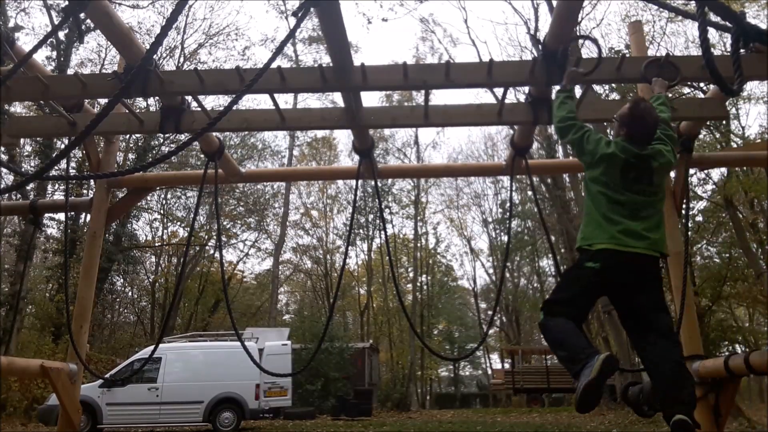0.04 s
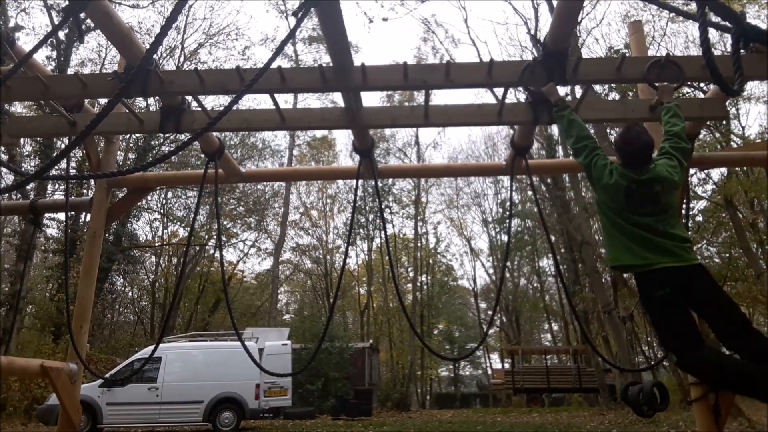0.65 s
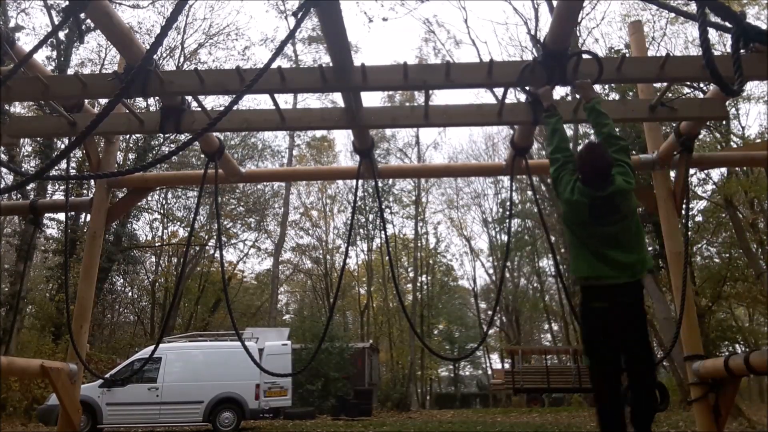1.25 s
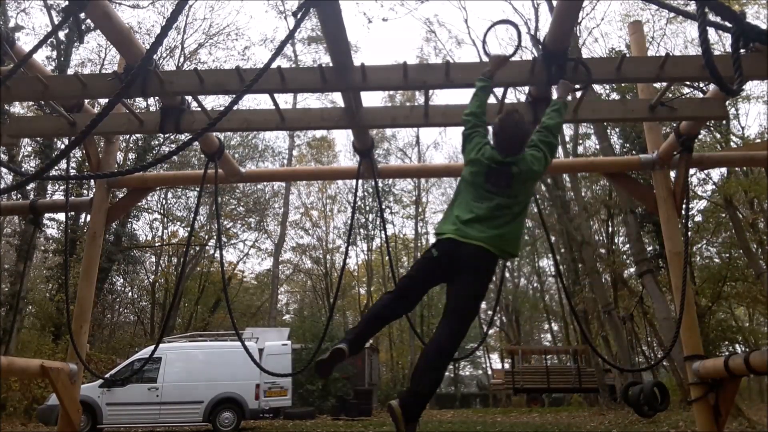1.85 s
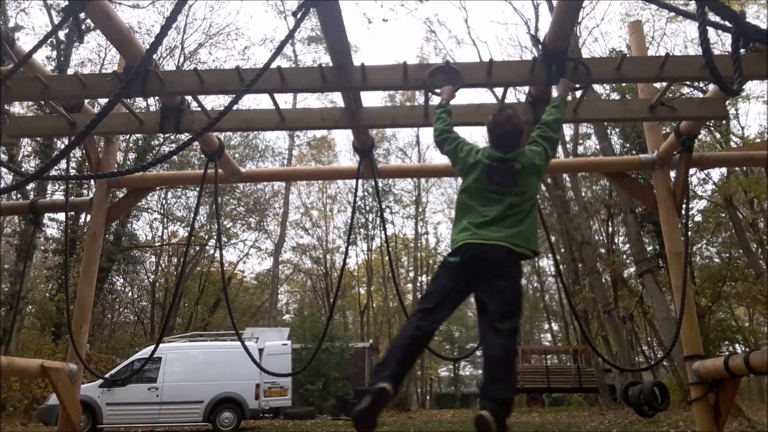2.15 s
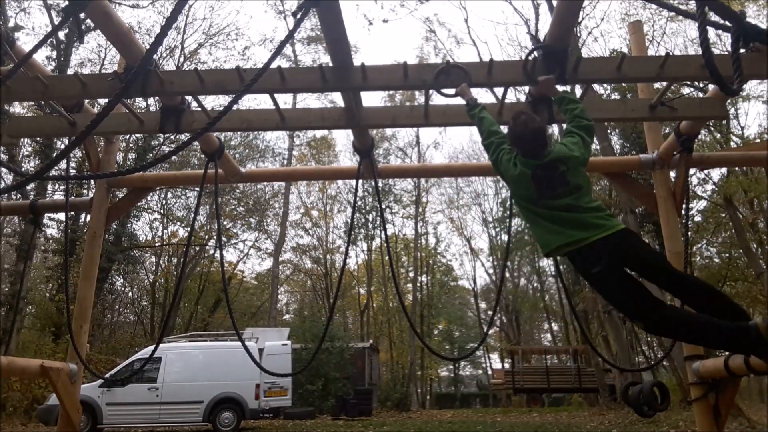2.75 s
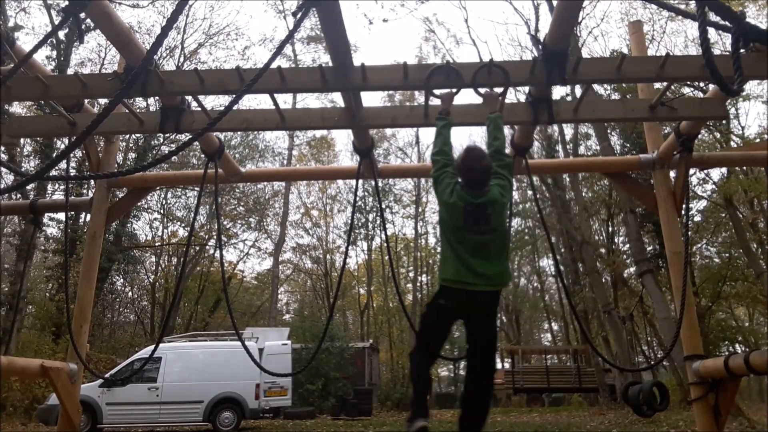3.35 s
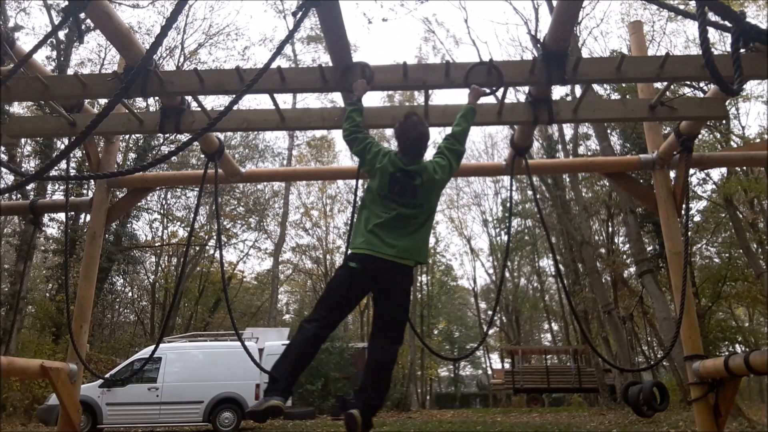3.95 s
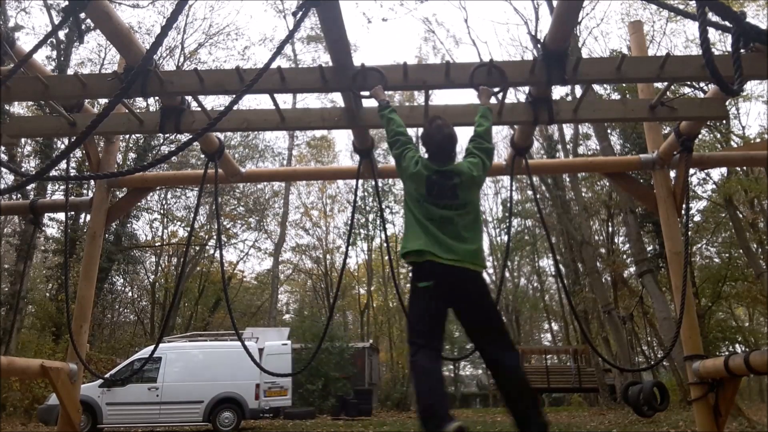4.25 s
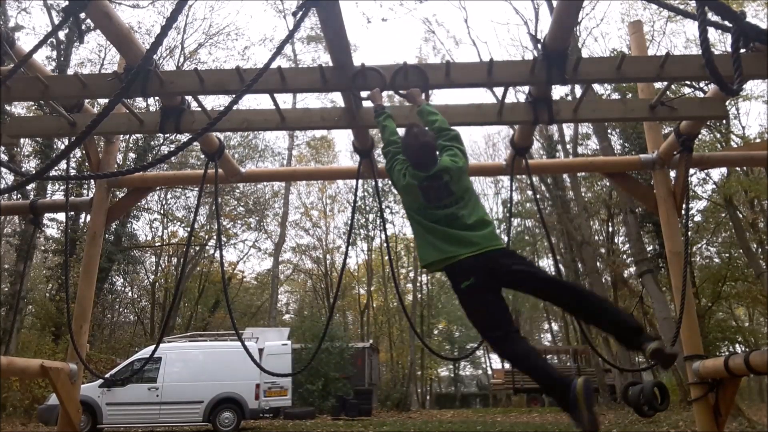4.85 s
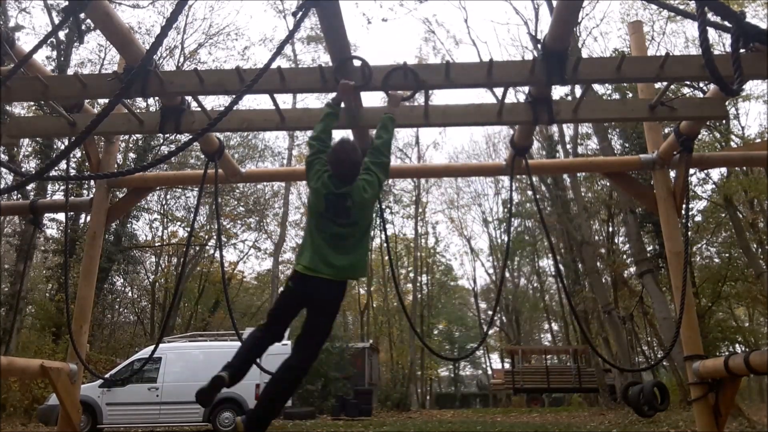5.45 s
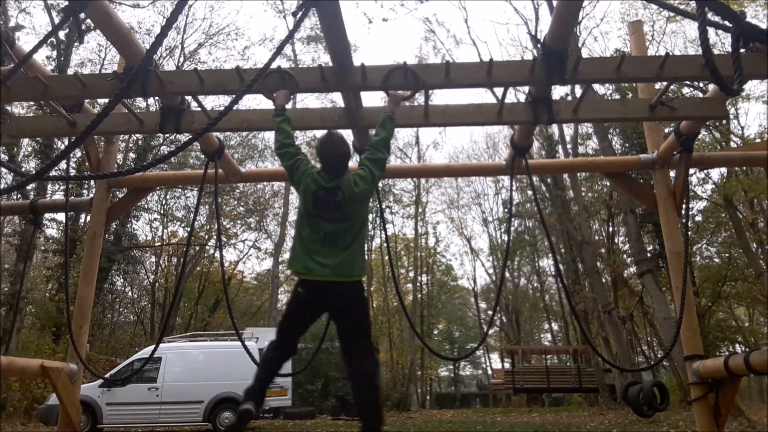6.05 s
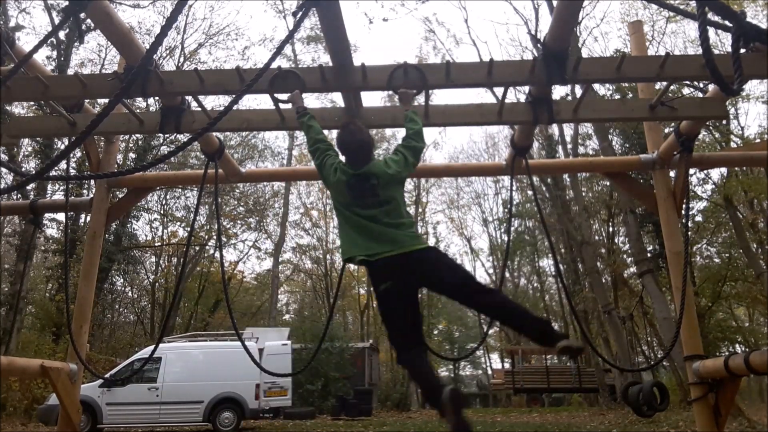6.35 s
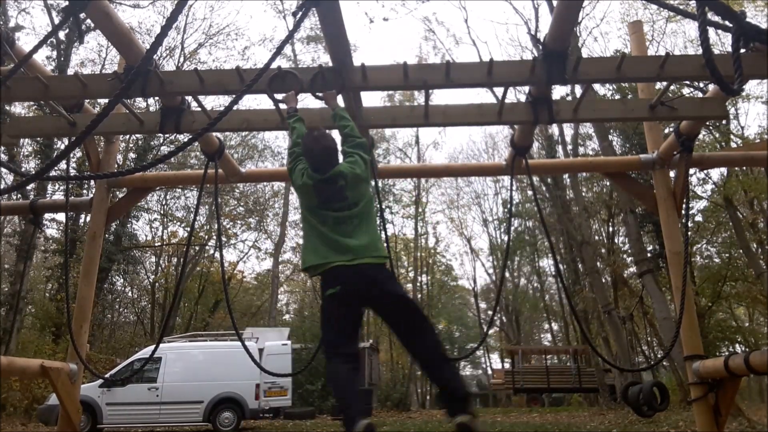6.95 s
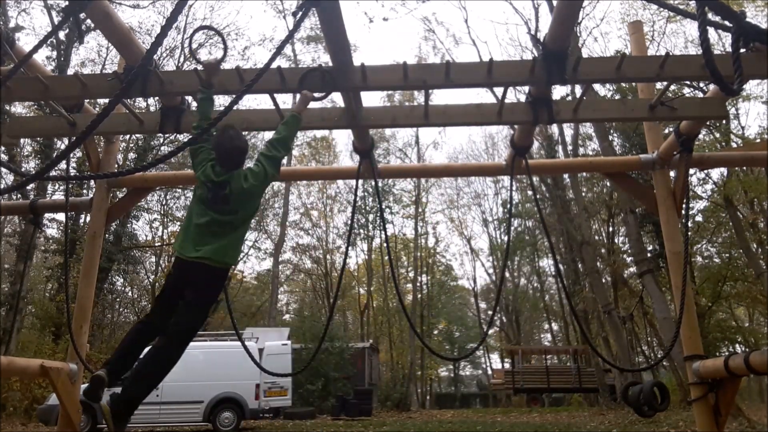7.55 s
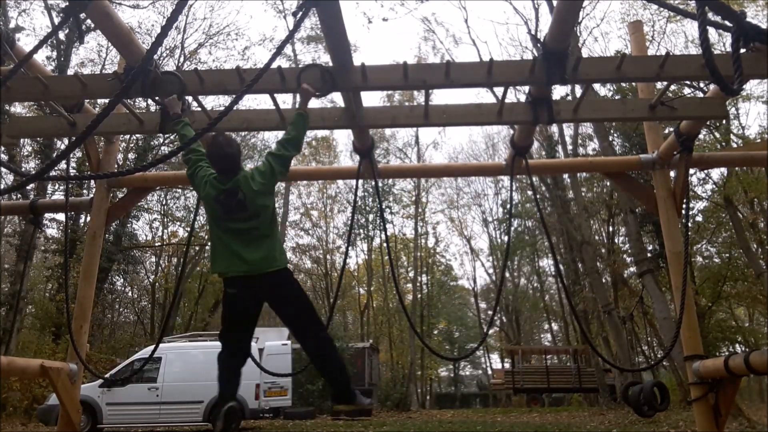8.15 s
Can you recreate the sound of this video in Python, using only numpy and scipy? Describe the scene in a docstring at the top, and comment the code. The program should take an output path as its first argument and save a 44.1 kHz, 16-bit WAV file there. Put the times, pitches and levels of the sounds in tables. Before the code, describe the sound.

Sharp wooden knocks and quick rebounds of rings landing on pegs, with dull beam thumps, a soft distant rumble and rustling leaves.

```python
"""At an outdoor timber frame among trees, a climber swings along, hooking two hand rings over pegs.
Each ring knocks on its wooden peg, bounces and settles. The ring hums briefly, the beam thuds under
the weight, and a ring turning on its peg groans and squeaks. The trees scatter a faint echo.
Behind it all are a distant rumble, rustling leaves and one thin bird call."""
import sys
import numpy as np
from scipy import signal
from scipy.fft import rfft, irfft, next_fast_len
from scipy.io import wavfile
from scipy.ndimage import map_coordinates

SR = 44100
rng = np.random.default_rng(int(sys.argv[2]) if len(sys.argv) > 2 else 0)


def to_wav(s):
    """Save 16-bit WAV."""
    ch = np.atleast_2d(s).T  # columns
    pcm = np.round(np.clip(ch, -1, 1) * 32767)  # PCM
    wavfile.write(sys.argv[1], SR, pcm.astype(np.int16))


N = 362061
CLOCK = np.arange(N) / SR
KNOCK_CLOCK = np.arange(SR // 2) / SR

# Table levels are relative. A decay is the base time to fade by 60 dB.
# how the background swells: time_s, rumble_db, leaves_db
AIR_LEVELS = [(0, -67.5, -62), (0.6, -64, -60.5), (1.35, -65, -60), (1.8, -61.5, -56.5), (8.21, -61, -54.5)]
# tone of the rumble and the leaves: pitch_hz, level_db
RUMBLE_TONE = [(20, -37), (40, -3), (70, 6.5), (120, 3.5), (220, -1), (400, -8), (800, -41), (2000, -66)]
LEAVES_TONE = [(200, -10), (550, -5), (950, 0), (1500, -2), (2200, -6), (3200, -12.5), (5000, -17.5),
               (7500, -20), (8500, -29.5), (9700, -30.5), (12000, -26.5), (16000, -27)]
# how alike left and right are (1 = the same): pitch_hz, likeness
AIR_LIKENESS = [(30, 0.038), (70, 0.87), (180, 1), (550, 0.36), (1650, -0.21), (5000, 0.02)]
WOOD_LIKENESS = [(100, 0.81), (500, 0.83), (800, 0.73), (1400, 0.12), (3000, 0.12), (12000, 0.17)]
# how the bird call swells: time_s, level_db
BIRD_LEVELS = [(5.70, -90), (5.78, -76), (5.88, -86), (5.98, -72), (6.10, -70), (6.2, -95)]
# how long the trees echo: pitch_hz, decay_s
ECHO_DECAY = [(150, 0.61), (500, 0.66), (1200, 0.82), (4000, 0.86), (10000, 0.19)]
# notes that a struck hand ring or beam sounds by itself: pitch_hz, level_db, decay_s
HUM_MODES = [(489.1, 7.5, 0.18), (664, -14, 0.44)]
CLACK_MODES = [(2208, 2, 0.072), (2913, -8, 0.067), (3530, -10.5, 0.039), (4515, -1.5, 0.015),
               (5850, -8, 0.029), (7750, -16.5, 0.056)]
BEAM_MODES = [(212.8, 0.015, 0.44), (342, 0.011, 0.56)]
# tone of each sound that the wood and the rings make: pitch_hz, level_db
THUMP_TONE = [(45, -24), (90, 4), (160, -4), (240, -18.5), (420, -37)]
BEAM_TONE = [(50, -51.5), (110, -2.5), (210, -6), (275, -3.5), (345, 0.5), (430, -4), (600, -37.5)]
PEG_TONE = [(330, -56.5), (480, -0.5), (570, 2.5), (655, 4), (730, 3.5), (900, 2), (1020, 4), (1170, -9),
            (1450, -31)]
RIM_TONE = [(900, -38.5), (1150, -9.5), (1370, -6), (1530, -0.5), (1640, -6), (1800, -25), (2300, -26)]
CLACK_TONE = [(1300, -50.5), (1900, -1), (2270, 4.5), (2600, -3.5), (2980, -12.5), (3250, -5.5), (3550, -6),
              (3950, -14.5), (4500, -7), (5300, -22), (7400, -40.5), (9000, -42.5)]
TICK_TONE = [(4000, -15), (7000, 9), (9500, -13.5), (12000, -1), (16000, -6.5)]
BUZZ_TONE = [(200, -26), (340, -6), (480, -8), (660, 4), (800, -21), (1000, -3.5), (1180, -8.5),
             (1400, -14), (1570, -5), (1800, -14), (2600, -32.5), (4000, -45.5)]
ZING_TONE = [(3700, -37), (4500, -12), (4950, 0), (5450, -10.5), (6500, -25.5)]
GROAN_TONE = [(300, -18), (440, -12.5), (490, 6), (550, -10.5), (660, -11.5), (900, -38)]
SQUEAK_TONE = [(600, -25), (900, -2), (1080, 1.5), (1250, -12), (1520, -3.5), (1900, -19.5),
               (5000, -29.5)]
# the frame takes the swinging weight: start_s, level_db, pitch_hz
THUMPS = [(0.764, -41.5, 153), (1.209, -37.5, 130), (1.623, -31.5, 114), (1.693, -28, 126),
          (2.749, -49, 198), (2.79, -41, 128), (3.899, -36, 83.5), (3.976, -39.5, 115), (7.963, -38, 144)]
# a loaded ring turns on its peg: middle_s, length_s, groan_db, squeak_db
RUBS = [(0.642, 0.064, -52.5, -55), (1.822, 0.081, -44.5, -47.5), (2.929, 0.054, -55.5, -57.5),
        (3.438, 0.16, -51.5, -55), (3.622, .11, -48.5, -48.5), (5.461, 0.16, -50, -57.5),
        (5.591, 0.11, -55.5, -77)]
# single wooden knocks: lone taps, and quick extra touches just after a landing or bounce:
# start_s, level_db, thud_db, hum_db, rim_db, clack_db, peg_hz (the later dB columns add to level_db)
TAPS = [(0.003, -17, -22.5, -20, -7.5, -16, 1101), (0.507, -11.5, -15.5, -19, -11, -25, 644),
        (0.724, -30, -26, -12.5, -22, -32, 697), (1.133, -11.5, -22.5, -18.5, -11.5, -25.5, 1012),
        (1.464, -39.5, -13, -9.5, -10.5, -18, 603), (1.532, -7.5, -23.5, -31, -8.5, -32, 638),
        (2.722, -15, -12, -28, -29, -26, 738), (3.133, -5, -32, -21, -11.5, -6.5, 922),
        (3.157, -8.5, -21, -11, -22, -20, 796), (3.177, -12.5, -17, -7.5, -7, -10, 647),
        (3.254, -21.5, -20, -2, -21, -14, 590), (3.345, -27.5, -7, 3, -22, -11.5, 580),
        (4.034, -13, -17, -24, -7, -7.5, 1060), (4.154, -9, -16.5, -28, -12.5, -24, 1035),
        (4.538, -25, -20.5, -2.5, -14.5, -23, 1064), (4.917, -7.5, -44, -16, -12, -39, 684),
        (4.966, -5, -34, -13.5, -13, -22.5, 627), (5.011, -18.5, -13, -7.5, -17.5, -15.5, 983),
        (5.656, -26, -6, -10.5, -26, -39, 713), (5.76, -29.5, -10.5, -24, -25, -4, 684),
        (5.843, -39, -26, -36, -22, 0, 737), (6.424, -19.5, -45, 0.5, -20, -28, 577),
        (7.161, -24, -22, -18.5, -32, -44, 851), (7.416, -19.5, -13, -15, -12.5, -23.5, 903),
        (7.821, -1, -31.5, -21.5, -23, -29, 920)]
# a ring drops on a peg:
# start_s, level_db, hum_db, clack_db, tick_db, chatter_db, peg_hz, rim_hz, clack_hz, decay_factor
LANDINGS = [(0.25, -1, -20, -23, -44, -48, 966, 1200, 2816, 0.74),
            (0.401, -3, -23.5, -13, -37, -36, 926, 1505, 2448, 0.83),
            (1.516, -1.5, -21.5, -25.5, -54, -28, 947, 1287, 2430, 0.66),
            (2.179, 0.5, -11, -23, -51, -30, 961, 1322, 2810, 0.72),
            (3.118, -0.5, -16, -9, -33.5, -29, 949, 1393, 3115, 1),
            (4.073, -2.5, -15.5, -12.5, -53, -43, 976, 1357, 3070, .65),
            (4.905, -3.5, -11, -8.5, -40, -48, 597, 1525, 2980, 0.67),
            (6.128, 4, -22.5, -17.5, -40, -39, 873, 1450, 2584, 0.8),
            (6.926, 2.5, -18, -20.5, -62, -32, 866, 1380, 2790, 0.73),
            (7.917, -2, -19.5, -20, -56, -30, 770, 1522, 2600, 0.68)]
# it bounces and comes down on the same peg: start_s, level_db, thud_db, clack_db, peg_hz
REBOUNDS = [(0.311, -25.5, -30, -14.5, 970), (0.468, -4, -24, -13.5, 664), (1.58, -10, -23.5, -24.5, 653),
            (2.235, -7, -19.5, -26.5, 1005), (3.225, -12, -17, -19, 638), (4.133, -4, -29, -20, 631),
            (4.955, -7.5, -38, -9, 587), (6.197, -4.5, -24, -12, 940), (6.979, 0.5, -24, -17.5, 747),
            (8.029, -9, -17.5, -39, 725)]

# a rebound carries more of the climber's weight: changes from the first blow
REBOUND_RIM_DB, REBOUND_HUM_DB, REBOUND_TICK_DB, REBOUND_CHATTER_DB = -1.5, 4, -8, 4
LANDING_THUD_DB = -34
TAP_TICK_DB, TAP_CHATTER_DB, TAP_RIM_HZ = -34, 5.5, 1403
PEG_DB, PEG_FALL = -12, 0.14  # the peg's share shrinks as the blow gets harder, dB per dB
RIM_DB, RIM_RISE = -6, 0.32  # the rim's rap grows with the clack, dB per dB
ZING_DB, ZING_RISE = -40.5, .5  # glancing blows zing more: dB for each dB less clack
CHATTER_DELAY_S, CHATTER_S = 0.0065, .05
TOP_HZ = 15900


def amp(db):
    """Turn decibels into a gain to multiply by."""
    return 10 ** (np.asarray(db) / 20)


def normalise(x, size=900):
    """Scale a sound so its first size samples have an average strength (rms) of 1."""
    return x / np.sqrt(np.mean(x[..., :size] ** 2) + 1e-20)


def look_up(table, hz):
    """Read between the rows of a table on a musical (log) pitch scale."""
    pitches, values = np.transpose(table)
    return np.interp(np.log(hz + 1), np.log(pitches + 1), values)


def wobble(rate):
    """A smooth curve through rate random points a second."""
    return map_coordinates(rng.standard_normal(int(N * rate / SR) + 4), [CLOCK * rate])


def colour(x, tone):
    """Filter a sound to follow a tone table, fading away beyond its ends."""
    size = 2 * next_fast_len(x.shape[-1] // 2 + 4096)
    hz = np.fft.rfftfreq(size, 1 / SR)
    octaves_outside = np.abs(np.log2((hz + 1) / np.clip(hz + 1, tone[0][0], tone[-1][0])))
    gain = amp(look_up(tone, hz) - 20 * octaves_outside)
    cepstrum = irfft(np.log(gain + 1e-6))
    # fold the filter so it rings only after a hit, never before
    cepstrum[1:size // 2] *= 2
    cepstrum[size // 2 + 1:] = 0
    return irfft(rfft(x, size) * np.exp(rfft(cepstrum)), size)[..., :x.shape[-1]]


def spread(pair, likeness):
    """Mix two unrelated sounds into a left and right that are partly alike."""
    hz = np.fft.rfftfreq(pair.shape[-1], 1 / SR)
    angle = np.arccos(np.clip(look_up(likeness, hz), -1, 1)) / 2
    mid, side = irfft(rfft(pair) * [np.cos(angle), np.sin(angle)], pair.shape[-1])
    return np.array([mid + side, mid - side])


def add(track, start_s, sound):
    """Mix a sound into the track."""
    part = track[:, max(round(start_s * SR), 0):][:, :sound.shape[-1]]
    part += sound[..., :part.shape[-1]]


def air_noise(tone):
    """A wide, steady rush of noise."""
    noise = spread(rng.standard_normal((2, N)), AIR_LIKENESS)
    return normalise(colour(noise, tone), size=N)


def rumble_and_leaves():
    """A distant rumble and a light, even rustle of leaves."""
    time_s, rumble_db, leaves_db = np.transpose(AIR_LEVELS)
    leaves_gain = amp(np.interp(CLOCK, time_s, leaves_db) + 3 + .4 * wobble(5))
    rumble_gain = amp(np.interp(CLOCK, time_s, rumble_db) + 4 + 2.1 * wobble(6.3))
    rumble = rumble_gain * air_noise(RUMBLE_TONE)
    leaves = leaves_gain * air_noise(LEAVES_TONE)
    return rumble * amp([[-3.8], [2.1]]) + leaves * amp([[-.6], [.6]])  # both lean to the right


def bird():
    """A thin, quavering whistle far up in the trees."""
    pitch_hz = 7450 + 130 * wobble(90)
    level_db = np.interp(CLOCK, *np.transpose(BIRD_LEVELS), left=-120, right=-120)
    return amp(level_db + 2.5 * wobble(35)) * np.sin(2 * np.pi * np.cumsum(pitch_hz) / SR)


def tree_echo(x):
    """Trunks scatter the sound into a thin echo."""
    hz, t, noise = signal.stft(rng.standard_normal((2, SR)), SR, nperseg=256)
    fade = amp(-60 * t / look_up(ECHO_DECAY, hz)[:, None])
    rise = 1 - np.exp(-t / 0.006)
    tail = signal.istft(noise * fade * rise, SR, nperseg=256)[1]
    return signal.fftconvolve(x, tail / np.linalg.norm(tail[0]), axes=1)[:, :N]


def wood(tone, decay_s, linger_db, linger_s):
    """Struck wood sounds many notes at once: a quick burst, and a weaker part that lingers."""
    fade = amp(-60 * KNOCK_CLOCK / decay_s) + amp(linger_db - 60 * KNOCK_CLOCK / linger_s)
    rise = 1 - np.exp(-KNOCK_CLOCK / (0.018 * decay_s))  # slow to fade means slow to build
    noise = spread(rng.standard_normal((2, len(KNOCK_CLOCK))), WOOD_LIKENESS)
    return normalise(colour(noise * rise * fade, tone))


def ringing(modes, decay_factor, detune, scatter_db, width):
    """Clear, fading notes; grip and point of contact shift their pitch and strength."""
    out = np.zeros((2, len(KNOCK_CLOCK)))
    for hz, db, decay_s in modes:
        shift, strength, lag = rng.standard_normal(3)
        side_phase = width * lag * np.array([[1], [-1]])  # puts left and right out of step
        phase = 2 * np.pi * hz * (1 + detune * shift) * KNOCK_CLOCK + side_phase
        fade_db = 60 * KNOCK_CLOCK / (decay_s * decay_factor)
        out += amp(db + scatter_db * strength - fade_db) * np.sin(phase)
    rise = 1 - np.exp(-KNOCK_CLOCK * modes[0][0])
    return normalise(out * rise)


def note(hz, base_decay_s, width):
    """The strongest single note of a knock."""
    return ringing([(hz, 0, base_decay_s)], decay_factor=0.94, detune=0, scatter_db=0, width=width)


def frame_thumps():
    """Dull, faintly pitched thumps as the beams take the load."""
    out = np.zeros((2, N))
    for start_s, db, hz in THUMPS:
        push = wood(THUMP_TONE, 0.06, linger_db=-28.5, linger_s=.15)
        add(out, start_s, amp(db - 11.5) * push + amp(db - 11) * note(hz, 0.11, width=.15))
    return out


def slips(length_s, per_second):
    """Tiny, uneven touches that swell and fade."""
    swell = np.sin(np.pi * np.clip(KNOCK_CLOCK / length_s, 0, 1))
    touches = rng.random(len(KNOCK_CLOCK)) < per_second / SR
    return spread(swell * touches * rng.standard_normal((2, len(KNOCK_CLOCK))), WOOD_LIKENESS)


def ring_rubs():
    """Ring and peg stick and slip, which makes a low groan and a wooden squeak."""
    out = np.zeros((2, N))
    for middle_s, length_s, groan_db, squeak_db in RUBS:
        friction = slips(length_s, per_second=490)
        size = int(length_s * SR)
        groan = amp(groan_db) * normalise(colour(friction, GROAN_TONE), size)
        squeak = amp(squeak_db) * normalise(colour(friction, SQUEAK_TONE), size)
        add(out, middle_s - length_s / 2, groan + squeak)
    return out


def chatter(db, clack_db):
    """As a ring settles, tiny quick bounces blur into a wooden buzz with a thin zing on top."""
    bounces = slips(CHATTER_S, per_second=900)
    size = int(CHATTER_S * SR)
    buzz = normalise(colour(bounces, BUZZ_TONE), size)
    zing = amp(ZING_DB - ZING_RISE * clack_db) * normalise(colour(bounces, ZING_TONE), size)
    return amp(db) * (buzz + zing) * amp([[-1.2], [1.2]])


def knock(db, thud_db, hum_db, rim_db, clack_db, tick_db, peg_hz, rim_hz, clack_hz, decay_factor):
    """One blow shakes ring, peg and beam; a hard one adds a clack and a tick."""
    sides = np.array([[.5], [-.5]])
    hardness = np.clip((db + 37) / 22, 0, 1)  # gentle touches carry little treble
    peg_db = PEG_DB - PEG_FALL * db
    thud = amp(thud_db - 5.5) * wood(BEAM_TONE, 0.31 * decay_factor, linger_db=-4, linger_s=0.27)
    thud += amp(thud_db - 10.5) * ringing(BEAM_MODES, decay_factor, 0.0078, scatter_db=6, width=.05)
    hum = amp(hum_db + 0.2) * ringing(HUM_MODES, decay_factor, 0.0094, scatter_db=4, width=.08)
    peg = amp(peg_db - 1) * wood(PEG_TONE, 0.05 * decay_factor, linger_db=-3, linger_s=0.19)
    peg += amp(peg_db - 2.5) * note(peg_hz, 0.14 * decay_factor, width=0.49)
    rim = amp(rim_db - 2.5) * wood(RIM_TONE, 0.062 * decay_factor, linger_db=-13.5, linger_s=0.13)
    rim += amp(rim_db - 5) * note(rim_hz, 0.062 * decay_factor, width=0.23)
    clack = amp(clack_db - 7) * wood(CLACK_TONE, 0.045 * decay_factor, linger_db=-29, linger_s=0.28)
    clack += amp(clack_db - 10.5) * ringing(CLACK_MODES, decay_factor, 0.022, scatter_db=-1, width=1)
    clack += amp(clack_db - 12) * note(clack_hz, 0.057 * decay_factor, width=0.58)
    tick = hardness * amp(tick_db + 2) * wood(TICK_TONE, 0.012, linger_db=-22, linger_s=0.14)
    rap = rim + np.sqrt(hardness) * clack
    return amp(db - 7) * (thud + hum + peg + rap * amp(-2.6 * sides) + tick * amp(5.7 * sides))


def ring_taps():
    """Single wooden knocks, alone or just after a landing or bounce; more thud and rim, more chatter."""
    out = np.zeros((2, N))
    for start_s, db, thud_db, hum_db, rim_db, clack_db, peg_hz in TAPS:
        rim_hz = TAP_RIM_HZ * (1 + .05 * rng.standard_normal())  # varies from knock to knock
        tap = knock(db, thud_db, hum_db, rim_db, clack_db, clack_db + TAP_TICK_DB, peg_hz, rim_hz,
                    clack_hz=2516, decay_factor=0.7)
        add(out, start_s, tap)
        add(out, start_s + CHATTER_DELAY_S, chatter(db + thud_db + rim_db + TAP_CHATTER_DB, clack_db))
    return out


def ring_landings():
    """A ring hits a peg, flies up and lands again with the same rim and clack notes; both hits chatter."""
    out = np.zeros((2, N))
    for landing, rebound in zip(LANDINGS, REBOUNDS):
        start_s, db, hum_db, clack_db, tick_db, chatter_db, peg_hz, rim_hz, clack_hz, decay = landing
        rim_db = RIM_DB + RIM_RISE * clack_db
        first = knock(db, LANDING_THUD_DB, hum_db, rim_db, clack_db, tick_db,
                      peg_hz, rim_hz, clack_hz, decay)
        add(out, start_s, first)
        add(out, start_s + CHATTER_DELAY_S, chatter(db + chatter_db, clack_db))

        start_s, db, thud_db, second_clack_db, peg_hz = rebound
        rim_db = RIM_DB + REBOUND_RIM_DB + RIM_RISE * second_clack_db
        second = knock(db, thud_db, hum_db + REBOUND_HUM_DB, rim_db, second_clack_db,
                       tick_db + REBOUND_TICK_DB, peg_hz, rim_hz, clack_hz, decay)
        add(out, start_s, second)
        add(out, start_s + CHATTER_DELAY_S, chatter(db + chatter_db + REBOUND_CHATTER_DB, clack_db))
    return out


def scene():
    """The climbing, its echo and the background among the trees."""
    climbing = ring_landings() + ring_taps() + frame_thumps() + ring_rubs()
    return climbing + amp(-22.5) * tree_echo(climbing) + rumble_and_leaves() + bird()


def record(dry):
    """Round off the hardest peaks and cut the very highest treble."""
    rounded = dry / (1 + np.abs(dry / .92) ** 4) ** (1 / 4)
    size = next_fast_len(N + 8192)
    treble_cut = np.clip((TOP_HZ + 300 - np.fft.rfftfreq(size, 1 / SR)) / 500, 0, 1)
    return irfft(rfft(rounded, size) * treble_cut, size)[:, :N]


dry = scene()
out = record(dry)
to_wav(out)
```